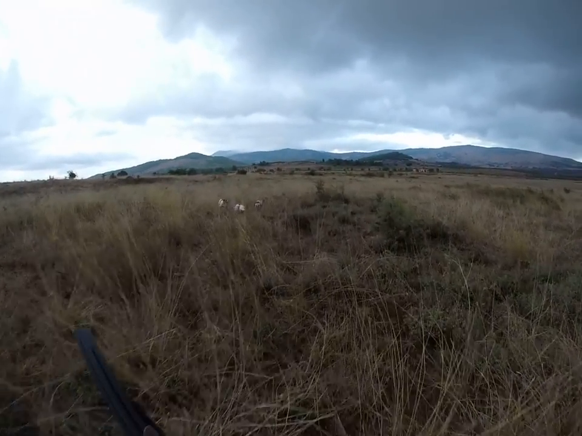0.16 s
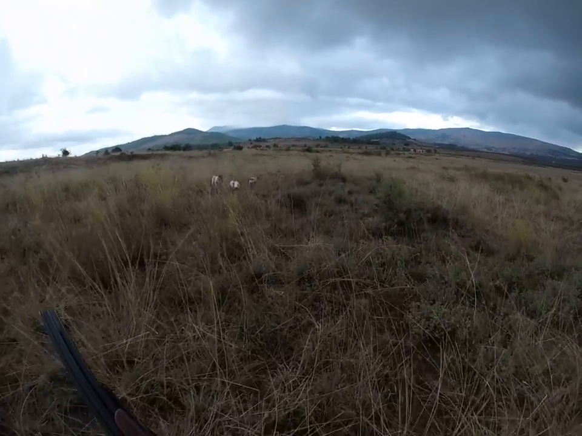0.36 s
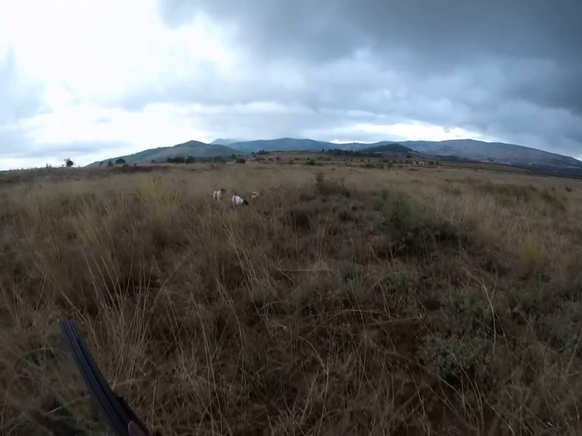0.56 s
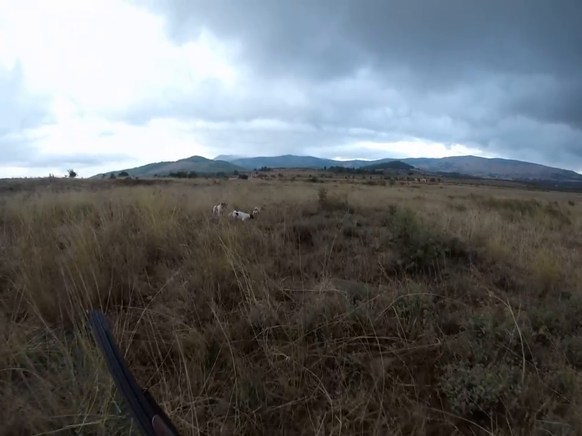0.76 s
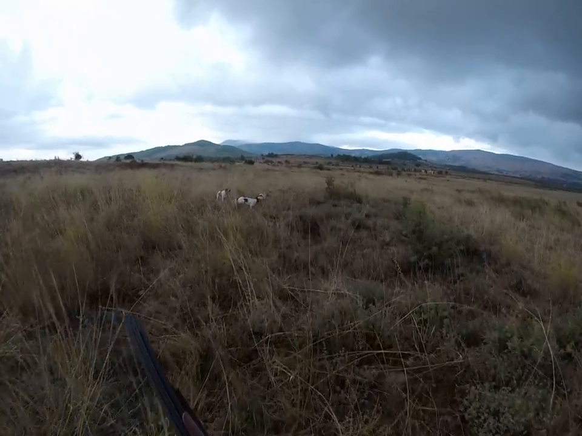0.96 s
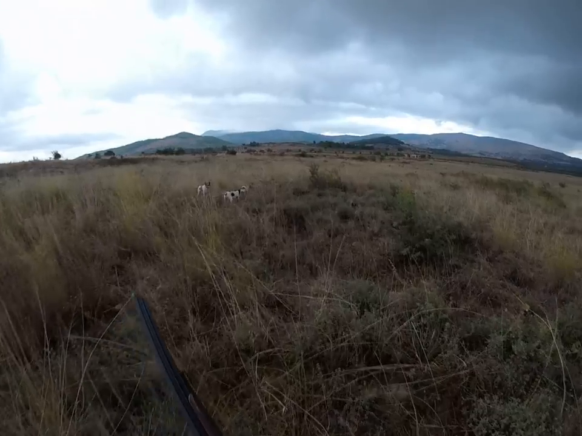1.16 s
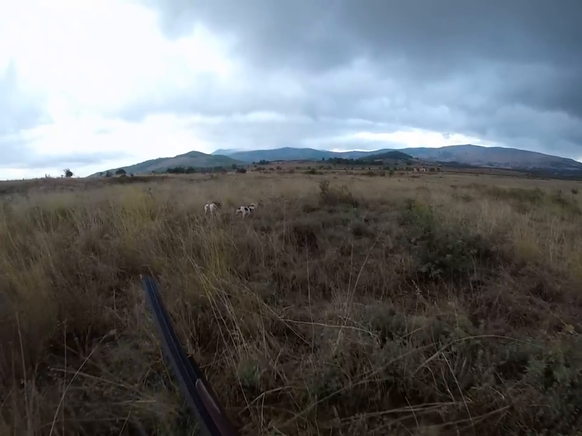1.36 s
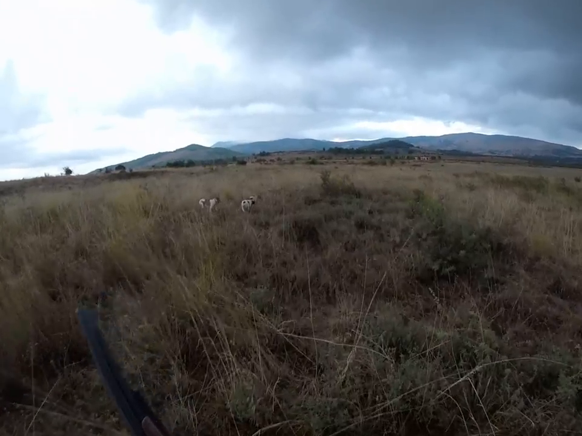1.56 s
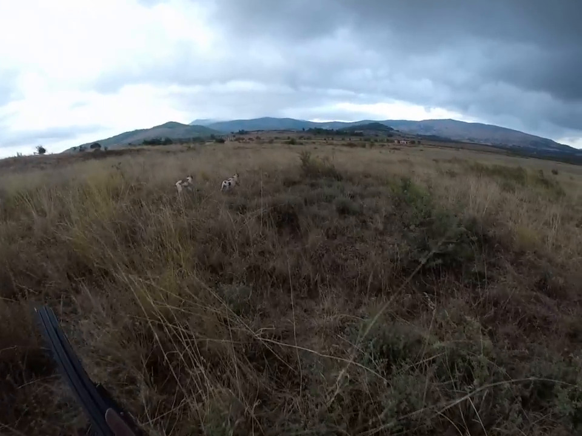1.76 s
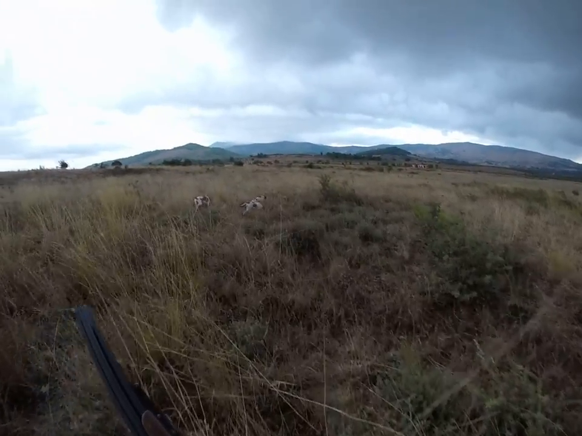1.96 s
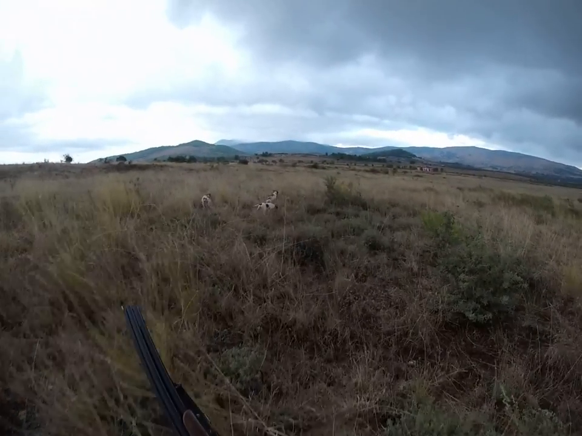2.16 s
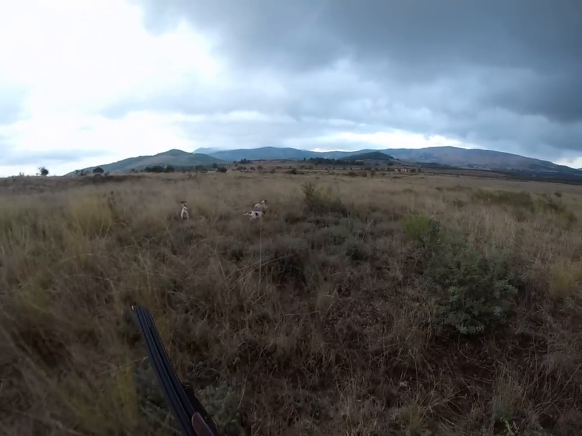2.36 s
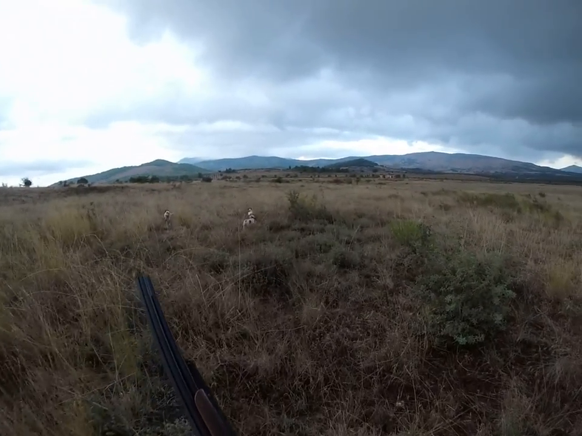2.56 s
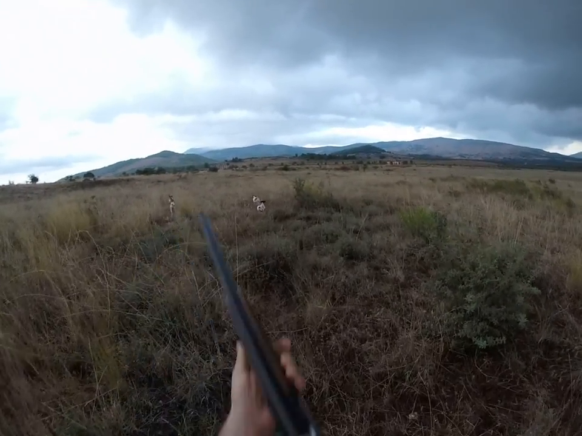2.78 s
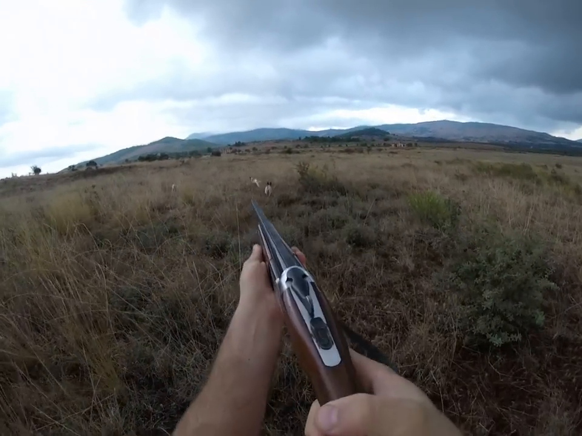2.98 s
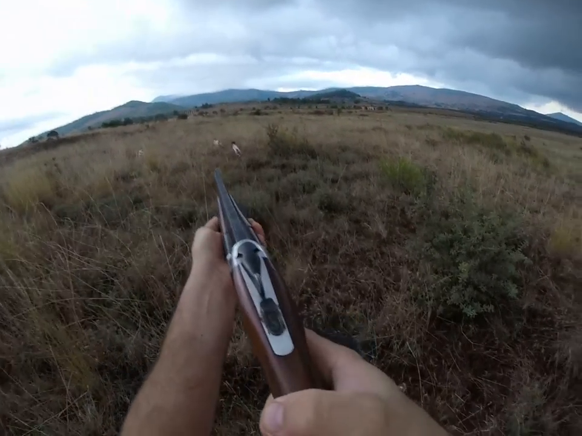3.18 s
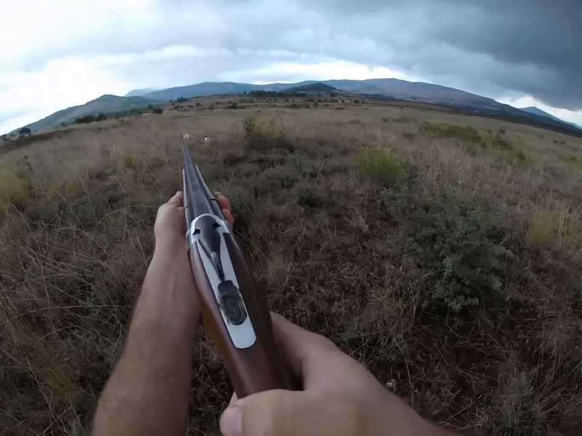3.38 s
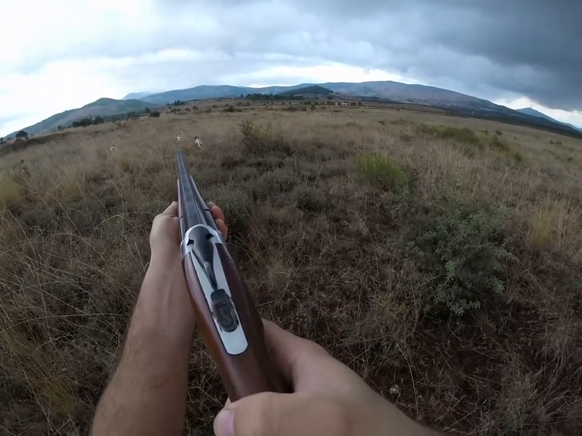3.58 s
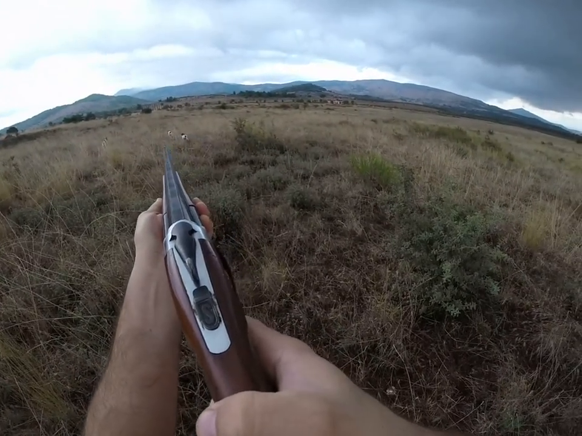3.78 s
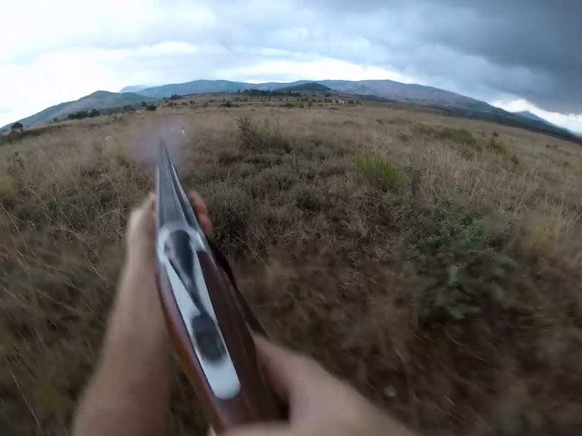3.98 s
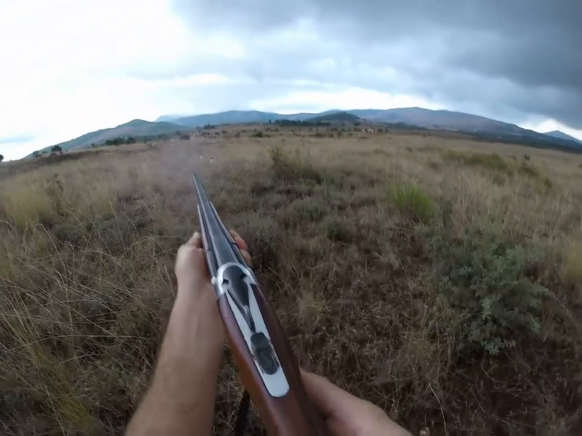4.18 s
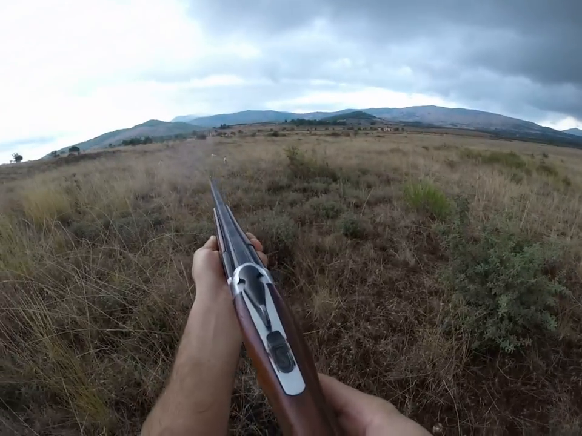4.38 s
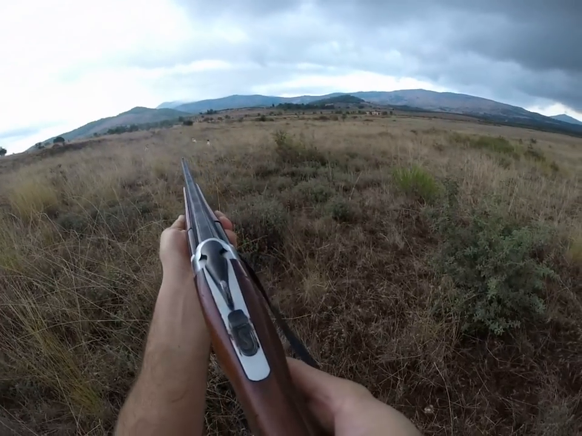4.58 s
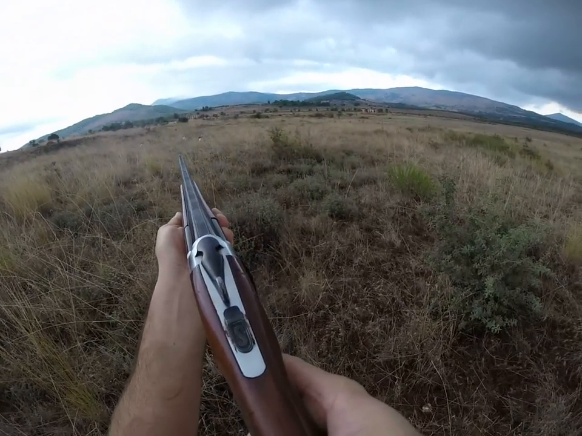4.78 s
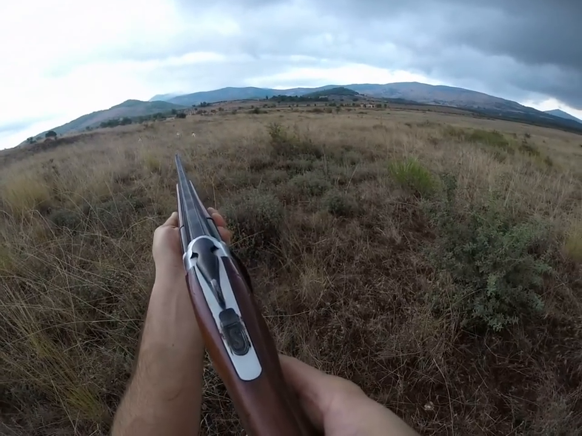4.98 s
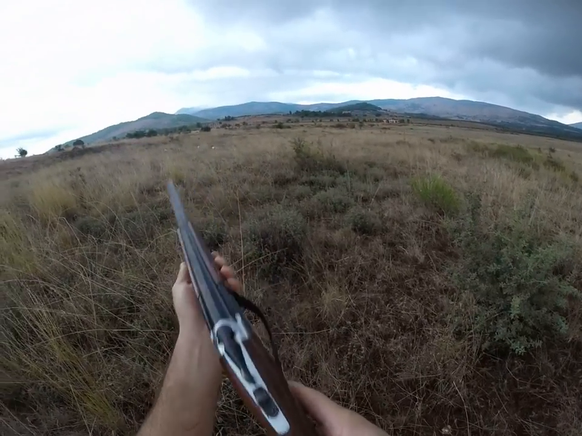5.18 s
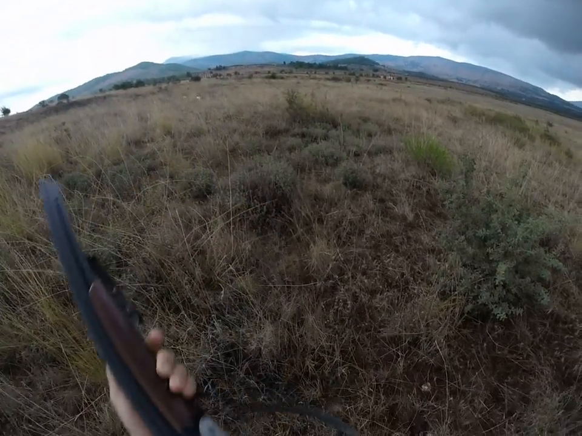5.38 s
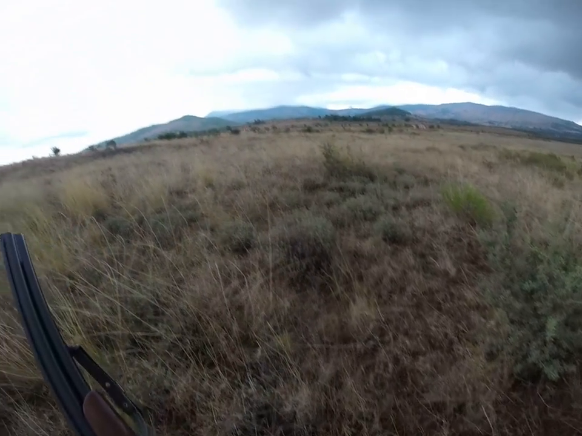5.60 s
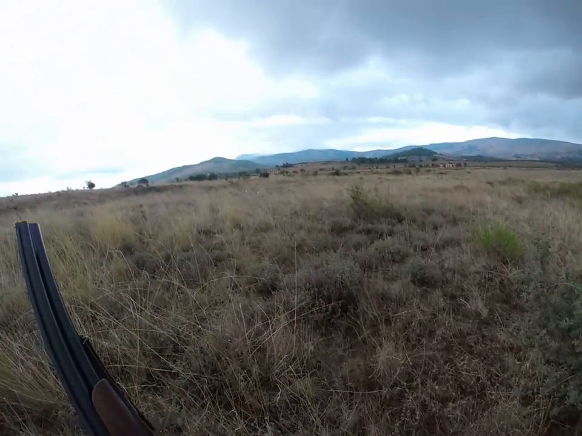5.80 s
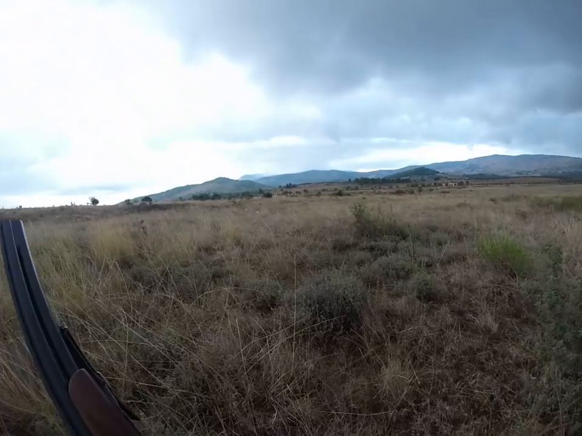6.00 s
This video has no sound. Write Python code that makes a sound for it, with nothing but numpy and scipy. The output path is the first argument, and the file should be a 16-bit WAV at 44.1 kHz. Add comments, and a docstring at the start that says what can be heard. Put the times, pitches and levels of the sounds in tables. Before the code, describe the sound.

A cased microphone on a hunter's head picks up walking through dry grass in open country. Strong low thumps with dull knocks come around 0.2, 0.9, 1.5 and 2.0 seconds, weaker near 2.7, with buckle ticks clustered in the first half second, short scuffs and faint dry swishes. Soft low wind and hiss lie underneath. From about 2.7 to 3.2 seconds cloth and straps rustle closer as the shotgun is shouldered, followed by relative quiet and tiny ticks around 3.5. At 4.05 seconds one abrupt, overloaded shotgun blast hits with a low push and recoil thud; a grainy echo from ground, scrub and distant slopes fades within roughly half a second. The background stays pressed down, then gradually recovers. Light rubbing comes around 5.2 to 5.4, a low jolt and faint knock near 5.6, and from 5.76 to 5.85 a quick cluster of steely latch and hinge clicks.

```python
"""A hunter walks through dry grass with a small cased camera on the head, which carries the microphone.
Footfalls jolt it from the start, its mount knocks, buckles tick, and cloth and grass rustle through its case.
The cloth swells as the shotgun is shouldered. The gun fires once and recoils: lock, blast, low push, ground
echo, then the return from scrub, field and far slopes. The recorder ducks just ahead of the blast and brings
its gain back slowly; more jolts and scuffs follow, then latch and hinge ring as the gun breaks open."""
import sys
import numpy as np
from scipy import signal
from scipy.fft import rfft, irfft, next_fast_len
from scipy.io import wavfile
from scipy.ndimage import uniform_filter1d, minimum_filter1d

SR = 44100
rng = np.random.default_rng(int(sys.argv[2]) if len(sys.argv) > 2 else 0)


def wav_record(signal):
    """Record a signal, one row per channel, as 16-bit PCM in the file named by sys.argv[1]."""
    frames = np.transpose(np.atleast_2d(signal))
    bounded = np.clip(frames, -1, 1)
    # unit amplitude maps onto the largest positive 16-bit level
    quanta = np.round(bounded * 32767).astype(np.int16)
    wavfile.write(sys.argv[1], SR, quanta)


N = 266477

# Footfalls, head movements and the gun's recoil shaking the camera, levels ahead of a low-pass:
# (time of deepest swing [s], peak level [dB], swing frequency [Hz], t60 [s])
JOLTS = [(0.218, -8, 33.2, 0.19), (0.308, -14.5, 19.6, 0.18), (0.884, -10, 29.7, 0.37),
         (0.97, -16, 29, 0.26), (1.031, -20.5, 22.4, 0.1), (1.46, -13, 28, 0.039), (1.498, -14, 24, 0.17),
         (1.562, -20, 26, 0.42), (2.005, -15.5, 30.3, 0.31), (2.047, -14, 25.9, 0.52),
         (2.152, -17.5, 20.9, 0.18), (2.62, -23.5, 23, 0.14), (2.658, -17, 35.8, 0.47),
         (2.706, -19, 22.2, 0.42), (2.748, -18.5, 25, 0.11), (2.817, -23, 17.6, 0.51),
         (3.076, -26, 44, 0.19), (3.124, -16, 18.4, 0.089), (3.228, -20.5, 20.7, 0.16),
         (4.07, -7.5, 51, 0.044), (4.113, -27.5, 21, 0.23), (4.162, -18, 33, 0.15), (4.26, -24, 24, 0.2),
         (5.182, -28, 47, 0.13), (5.379, -25, 15.4, 0.23), (5.572, -14, 39.3, 0.2)]


def blast():
    """Close to the gun: three noise bursts that rattle the case, each rising, holding and dying away."""
    # lock, blast, ground echo: (time [s], rms level [dB], rise [s], hold [s], t60 [s])
    bursts = [(4.0421, 0.5, 0.0021, 0.00064, 0.0081), (4.0463, 22, .0003, .003, 0.0099),
              (4.053, 2.5, 0.00096, 0.0029, .03)]
    # spectrum of the bursts: (frequency [Hz], level [dB])
    blast_colour = [(300, -10.5), (800, -11), (1500, -2.5), (2100, -2.5), (3000, -3), (6500, -5.5),
                    (8000, -19.5), (11000, -26.5), (15000, -42)]
    out, t = np.zeros(N), np.arange(3000) / SR
    noise = rng.standard_normal((len(bursts), len(t)))
    for (s, db, rise, hold, t60), row in zip(bursts, noise):
        decay = amp(-60 * np.maximum(t - rise - hold, 0) / t60)
        shape = np.minimum(t / rise, 1) * decay
        add(out, s, amp(db) * shape * coloured(row, blast_colour, cased=True))
    return out


def pressure_push():
    """The blast's low pressure swing pushes the diaphragm, which vents and swings back."""
    # the push ahead of venting: (time [s], level [dB], length [s], venting frequency [Hz])
    push = (4.0463, 16, 0.0048, 44)
    out, t = np.zeros(N), np.arange(3000) / SR
    s, db, length, hz = push
    w = 2 * np.pi * hz
    rebound = signal.bilinear([1, 0, 0], [1, 4 * w / 3, w ** 2], SR)  # second-order high-pass
    half_sine = np.sin(np.pi * np.minimum(t / length, 1))
    add(out, s, -amp(db) * signal.lfilter(*rebound, half_sine))
    return out


def field_return():
    """The blast scattered back from near and far: grainy noise under overlapping echoes."""
    # spectrum of the return: (frequency [Hz], level [dB])
    return_colour = [(150, -5), (300, -3), (600, -12), (1100, -14), (2000, -5.5), (3400, -5), (4800, -11),
                     (6500, -13), (10000, -23), (15000, -36)]
    grain = crackle(per_s=200, spread_db=3.0, smooth=1.1, puff_s=0.003)
    return echo_gain() * coloured(grain, return_colour, cased=True)


def echo_gain():
    """Gain over time of the echoes: each swells quickly and dies away; they add in power."""
    # scrub, field and far slopes: (time of peak [s], level [dB], rise [s], t60 [s])
    echoes = [(4.064, -15, .006, 0.044), (4.095, -37.5, .015, 0.29), (4.145, -40.5, 0.028, 0.55),
              (4.2, -46, 0.022, 0.35), (4.25, -51.5, .02, .4), (4.291, -46.5, 0.023, 0.39),
              (4.321, -50, 0.02, 0.063), (4.4, -58, 0.09, 1)]
    t = np.arange(N) / SR
    power = np.zeros(N)
    for s, db, rise, t60 in echoes:
        swell = np.clip(1 + (t - s) / rise, 0, 1)
        power += (swell * amp(db - 60 * np.maximum(t - s, 0) / t60)) ** 2
    return np.sqrt(power)


def latch():
    """Latch and hinge of the gun opening: contacts that ring the modes of the steel."""
    # contacts: (time [s], peak level [dB], brightness [dB per octave])
    contacts = [(5.7603, -38, 3), (5.7674, -43, 7), (5.7724, -35, -2), (5.7784, -32, 5), (5.7854, -40, -1),
                (5.7934, -32, 1.5), (5.8474, -45, 2), (5.8541, -39, 3)]
    # modes of the steel: (frequency [Hz], level [dB], t60 [s])
    steel_modes = [(1450, -31, 0.013), (1970, -10, 0.018), (2708, -2, 0.029), (3480, 10, 0.01),
                   (4550, -1, 0.011), (6000, 4, 0.012), (6300, -4.5, 0.068), (7400, -8, 0.029),
                   (7840, -39, .01), (10200, -30, 0.0086)]
    return struck(contacts, steel_modes, rattle_s=0.0024, crack_db=-35)


def jolts():
    """A lopsided swing of the microphone that builds in half a cycle and dies away."""
    out, t = np.zeros(N), np.arange(-2205, 13230) / SR
    for s, db, hz, t60 in JOLTS:
        shape = np.where(t < 0, np.exp(-(2.16 * hz * t) ** 2), amp(-60 * t / t60))
        turn = 2 * np.pi * hz * t
        # the mount is stiffer one way
        overtones = shape * (0.047 * np.cos(2 * turn) + 0.056 * shape * np.cos(3 * turn))
        add(out, s + t[0], -amp(db) * shape * (np.cos(turn) + overtones))
    return signal.sosfiltfilt(signal.butter(2, 130, fs=SR, output="sos"), out)


def sway():
    """Low wind on the microphone, and the loose shake of the head around each jolt, as low noise."""
    # low wind: (time [s], level [dB])
    wind = [(0.0, -42.5), (0.65, -43.5), (1.35, -38), (2.4, -44.5), (2.9, -33.5), (3.9, -41), (4.2, -55.5),
            (4.5, -37.5), (5.4, -40), (5.85, -37), (6.04, -35)]
    # spectrum of wind and shake: (frequency [Hz], level [dB])
    sway_colour = [(8, -17.5), (18, 8.5), (35, 3), (55, -13), (90, -23.5), (200, -30), (400, -69.5)]
    shake_db, shake_s = -17, 0.02  # level relative to the jolt, half length of the bell
    s, db, _, _ = np.transpose(JOLTS)
    gain = np.hypot(level(wind), bumps(s, db + shake_db, shake_s))
    return gain * coloured(rng.standard_normal(N), sway_colour)


def cloth():
    """Cloth and straps moving close to the case: grainy noise that swells as the gun is handled."""
    # movement, up while the gun is shouldered and lowered: (time [s], level [dB])
    movement = [(0, -62), (.4, -66.5), (1.2, -62.5), (2.0, -64.5), (2.64, -65), (2.76, -56.5),
                (3.05, -55.5), (3.6, -66), (4.0, -64.5), (4.45, -64.5), (4.75, -61.5), (5.0, -68.5),
                (5.3, -61.5), (5.6, -62.5), (6.04, -65.5)]
    # spectrum of cloth: (frequency [Hz], level [dB])
    cloth_colour = [(200, -11), (500, -6), (1200, -8), (2200, -5.5), (3500, -10), (6000, -15), (9000, -30),
                    (15000, -41)]
    grain = crackle(per_s=450, spread_db=2.0, smooth=1.6, puff_s=0.0034)
    return level(movement) * coloured(grain, cloth_colour, cased=True)


def grass():
    """Legs swishing through the grass further down: finer grain, with a faint stir between swishes."""
    # swishes: (time of middle [s], level [dB], half length [s])
    swishes = [(.2, -80, .1), (0.601, -73, 0.1), (0.868, -66, 0.14), (1.286, -63, 0.076),
               (1.955, -68.5, 0.1), (2.2, -77, .1), (2.66, -69, 0.049), (2.9, -73, 0.097),
               (3.474, -79, .09), (3.87, -74, 0.17), (5.45, -77, 0.075)]
    # spectrum of grass: (frequency [Hz], level [dB])
    grass_colour = [(1500, -8), (3500, 2), (6000, -2), (9000, -3.5), (12000, -6.5), (15000, -14)]
    stir_db = -80.5
    grain = crackle(per_s=650, spread_db=5.5, smooth=1.5, puff_s=0.001)
    gain = np.hypot(amp(stir_db), bumps(*np.transpose(swishes)))
    return gain * coloured(grain, grass_colour, cased=True)


def scuffs():
    """Sleeves, sling and stems scuffing past: brief uneven rubs heard through the case."""
    # rubs: (time [s], rms level [dB], length [s], centre frequency [Hz])
    rubs = [(0.0, -49, 0.015, 4500), (0.196, -58.5, 0.046, 3700), (0.247, -58, 0.02, 3300),
            (0.264, -60.5, 0.055, 2840), (0.873, -53, 0.023, 1900), (0.952, -55.5, 0.037, 2780),
            (0.99, -55, 0.02, 1940), (1.028, -56.5, 0.04, 1860), (1.503, -56.5, 0.037, 2700),
            (1.567, -56.5, 0.034, 2030), (1.625, -57, 0.038, 1980), (2.087, -56, 0.082, 1950),
            (2.697, -55.5, 0.047, 2200), (3.075, -53.5, 0.1, 1880), (3.184, -51, 0.067, 1830),
            (3.433, -62, 0.081, 1850), (4.136, -42.5, 0.0098, 1440), (4.693, -59.5, 0.017, 3260),
            (5.224, -59.5, 0.088, 1910), (5.386, -54, 0.043, 1890), (5.692, -59, 0.047, 1980)]
    spread_octaves = 0.42  # width of a rub about its centre
    out, noise = np.zeros(N), rng.standard_normal((len(rubs), 2, 6000))
    octaves = np.linspace(-3, 3, 13)
    skirt_db = -9 - 7.9 * abs(octaves)  # a little spills far from the centre
    band_db = np.maximum(-6 * (octaves / spread_octaves) ** 2, skirt_db)
    for (s, db, length, hz), (rush, slips) in zip(rubs, noise):
        uneven = amp(4.3 * evened(uniform_filter1d(slips, 150)))
        band = np.transpose([hz * 2 ** octaves, band_db])
        rub = coloured(rush * uneven, band, cased=True)[:round(length * SR)]
        add(out, s, amp(db) * rub * signal.windows.tukey(len(rub), 0.5))
    return out


def knocks():
    """The camera knocks in its mount after a footfall: short dull noise bursts."""
    # knocks: (time [s], peak level [dB], brightness [dB per octave])
    blows = [(0.242, -25.5, 2.5), (0.575, -44.5, 1.5), (0.909, -29, 2.3), (0.912, -34, -1.5),
             (1.484, -30.5, 2), (1.576, -45, -1), (1.65, -38, -2.5), (2.026, -32, -1.2), (2.079, -43, 2),
             (2.141, -36, 0.5), (5.632, -42, 0)]
    # spectrum of a knock before brightness: (frequency [Hz], level [dB])
    knock_colour = [(100, 7), (280, 12), (450, -3.5), (800, -4.5), (1400, -11.5), (2000, -4), (3000, -24.5),
                    (5000, -31), (12000, -59)]
    rise_s, t60_s = 0.00096, 0.051
    out, t = np.zeros(N), np.arange(2000) / SR
    noise = rng.standard_normal((len(blows), len(t)))
    shape = amp(-60 * t / t60_s) * np.minimum(t / rise_s, 1)
    for (s, db, bright), row in zip(blows, noise):
        burst = shape * coloured(row, tilted(knock_colour, bright, 1000))
        add(out, s, amp(db) * burst / abs(burst).max())
    return out


def ticks():
    """Buckles and sling swivels tick, with fainter ones between: contacts that ring small metal modes."""
    # the clearer ticks: (time [s], peak level [dB], brightness [dB per octave])
    clear_ticks = [(0.1361, -49.5, 2), (0.195, -36.5, 12), (0.2727, -35, -19), (0.2796, -40.5, -13),
                   (0.3255, -38.5, -1), (0.3596, -45, 0.1), (0.382, -37.5, 2), (0.6926, -39.5, -19),
                   (1.347, -45, -11), (2.1168, -42, 0), (2.5591, -43, -12), (2.7631, -46, -10),
                   (2.8398, -43.5, 27), (3.0004, -47.5, 12), (3.535, -45, 6), (3.5803, -46, -6),
                   (3.6234, -44.5, -15), (5.35, -45.5, -6), (5.5109, -46, -3)]
    # modes of the metal: (frequency [Hz], level [dB], t60 [s])
    tick_modes = [(2940, -3.5, 0.015), (3456, 5, 0.022), (4200, -4, 0.018), (5680, 0, 0.013),
                  (6960, -42, 0.0037)]
    every_tick = np.vstack([clear_ticks, faint_ticks()])
    return struck(every_tick, tick_modes, rattle_s=0.00084, crack_db=-33)


def faint_ticks():
    """Rows for small ticks at chance moments, in the columns of the clearer ones."""
    count, mean_db = 8, -51
    when, size, bright = rng.random((count, 3)).T
    return np.transpose([when * N / SR, mean_db + 6 * (size - 0.5), 20 * (bright - 0.7)])


def hiss():
    """Air and microphone noise: steady coloured noise behind everything."""
    # spectrum, relative: (frequency [Hz], level per Hz [dB])
    hiss_colour = [(35, -30.5), (60, -2.5), (81, -17.5), (141, -19.5), (302, -17.5), (332, -20),
                   (438, -22.5), (491, -24), (798, -25), (2310, -33.5), (13100, -50.5), (15000, -57)]
    rms_db = -56.5
    return amp(rms_db) * coloured(rng.standard_normal(N), hiss_colour)


def struck(events, modes, rattle_s, crack_db):
    """Each blow is a brief rattle that rings the same modes, unevenly and slightly detuned."""
    out, t = np.zeros(N), np.arange(3000) / SR
    hz, db, t60 = np.transpose(modes)[:, :, None]
    chance = rng.standard_normal((len(events), 2, len(modes), 1))
    rattles = rng.standard_normal((len(events), len(t))) * np.exp(-t / rattle_s)
    for (s, peak_db, bright), (tune, share), rattle in zip(events, chance, rattles):
        tilt_db = bright * np.log2(hz / 3500)
        each = amp(db + tilt_db + 2 * share - 60 * t / t60)
        ring = (each * np.sin(2 * np.pi * hz * (1 + 0.022 * tune) * t)).sum(0)
        ring = signal.fftconvolve(ring, rattle)[:len(t)]
        crack = np.gradient(uniform_filter1d(rattle, size=3))  # the contact itself, broad and thin
        add(out, s, amp(peak_db) * (ring / abs(ring).max() + amp(crack_db) * crack))
    return out


def crackle(per_s, spread_db, smooth, puff_s):
    """Steady noise plus soft puffs of uneven size."""
    starts = rng.random(N) < per_s / SR
    size = amp(spread_db * np.minimum(rng.exponential(1, N), 3)) * starts
    u = np.arange(1500) / SR / puff_s
    puffs = signal.oaconvolve(size, u * np.exp(-u))[:N]
    return (smooth + evened(puffs)) * rng.standard_normal(N)


def coloured(x, points, cased=False):
    """Noise shaped by a spectrum, and by the case resonances if it comes through the case; rms 1."""
    # case resonances: (frequency [Hz], width [Hz], lift [dB])
    resonances = [(1870, 390, 9), (2770, 620, 5.5), (3500, 380, 5), (5580, 580, 9), (6540, 460, 1),
                  (7500, 290, 5)]
    size = next_fast_len(len(x) + 2048)
    hz = np.fft.rfftfreq(size, 1 / SR)
    f, db = np.transpose(points)
    gain = amp(np.interp(np.log(hz + 1), np.log(f + 1), db))
    if cased:
        lift_db = sum(lift / (1 + (2 * (hz - f0) / width) ** 2) for f0, width, lift in resonances)
        gain = gain * amp(lift_db)
    return evened(irfft(rfft(x, size) * gain, size)[:len(x)])


def tilted(points, db_per_octave, pivot_hz):
    """A spectrum made brighter or duller about a pivot."""
    return [(hz, db + db_per_octave * np.log2(hz / pivot_hz)) for hz, db in points]


def level(rows):
    """Gain over time from the rows of a curve, straight in dB between them."""
    s, db = np.transpose(rows)
    return amp(np.interp(np.arange(N) / SR, s, db))


def bumps(middles, levels_db, half_s):
    """Gain over time of bell-shaped swells, added in power."""
    t = np.arange(N) / SR
    swells = np.broadcast(middles, levels_db, half_s)
    return np.sqrt(sum(amp(db) ** 2 * np.exp(-((t - s) / h) ** 2) for s, db, h in swells))


def amp(db):
    """Gain of a level in dB."""
    return 10 ** (np.asarray(db) / 20)


def evened(x):
    """Scaled to rms 1."""
    return x / np.sqrt(np.mean(x ** 2) + 1e-20)


def add(mix, s, sound):
    """Mixes a sound in at s seconds."""
    part = mix[round(s * SR):][:len(sound)]
    part += sound[:len(part)]


def scene():
    """Everything at the one microphone, from the gun to the background."""
    gun = blast() + pressure_push() + field_return() + latch()
    shaking = jolts() + sway() + knocks()
    moving = cloth() + grass() + scuffs() + ticks()
    return (gun + shaking + moving + hiss())[None]


def held(over_db, before_s, after_s, fall_db_per_s):
    """Keeps an excess from a little before it to a little after it, then lets it fall."""
    before, after = round(before_s * SR), round(after_s * SR)
    widened = -minimum_filter1d(-over_db, before + after + 1, origin=(after - before) // 2)
    fall = np.arange(N) * fall_db_per_s / SR
    return np.maximum(np.maximum.accumulate(widened + fall) - fall, 0)


def record(dry):
    """A look-ahead limiter and a slow gain control, overload, then the band limit."""
    threshold_db, slow_most_db, edge_hz = -2.5, 12.6, 15250
    ahead_s, hold_s, slow_hold_s = 0.0185, 0.012, 0.41
    power_db = 10 * np.log10(abs(uniform_filter1d(dry[0] ** 2, 88)) + 1e-12)
    over_db = np.maximum(power_db - threshold_db, 0)
    limiter_db = uniform_filter1d(held(over_db, ahead_s, hold_s, fall_db_per_s=1003.0), 44)
    slow_db = held(np.minimum(over_db, slow_most_db), 0, slow_hold_s, fall_db_per_s=21.5)
    pole = np.exp(-1 / (0.1 * SR))  # the slow gain takes a moment to come down
    slow_db = signal.lfilter([1 - pole], [1, -pole], slow_db)
    ducked = dry / amp(np.maximum(limiter_db, slow_db))
    overloaded = np.clip(ducked, -0.97, 0.97)
    band_limit = signal.firwin(511, edge_hz, window=("kaiser", 9), fs=SR)
    return signal.oaconvolve(overloaded, band_limit[None], "same")


dry = scene()
out = record(dry)
wav_record(out)
```